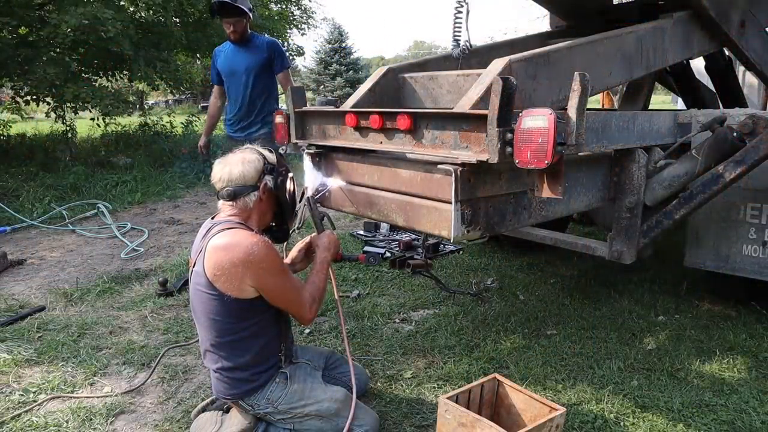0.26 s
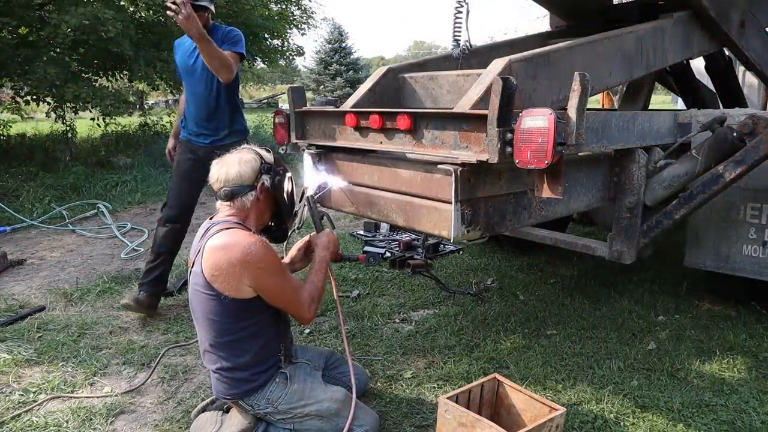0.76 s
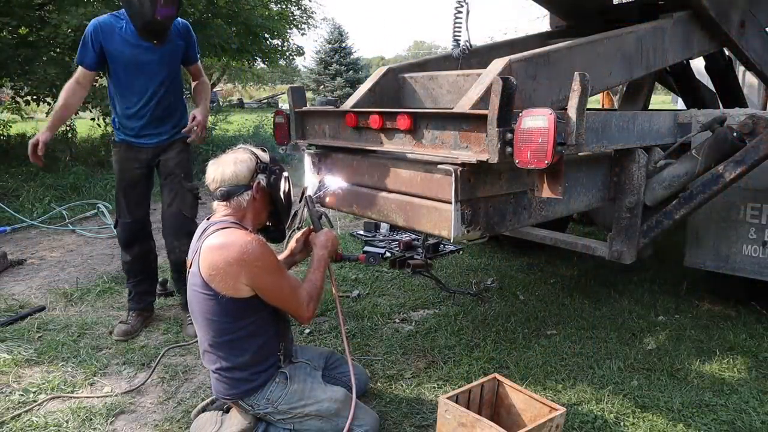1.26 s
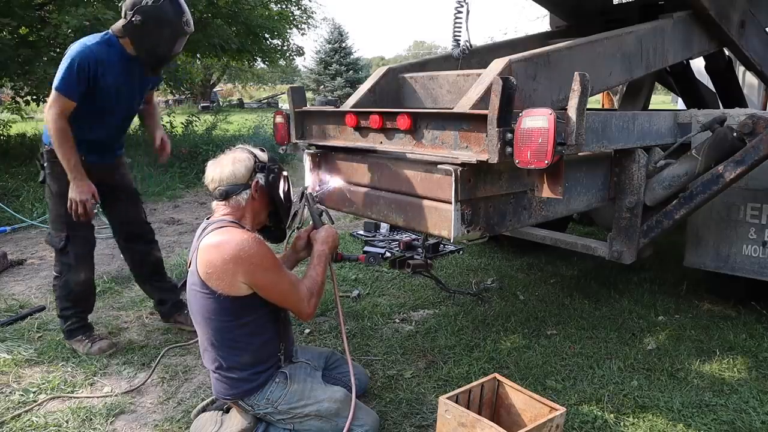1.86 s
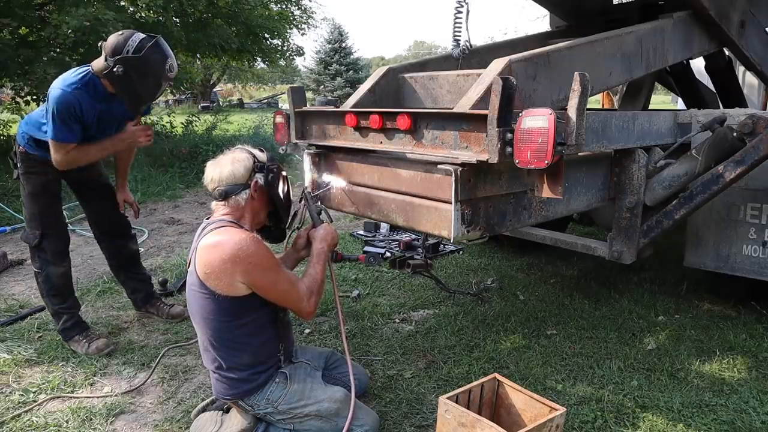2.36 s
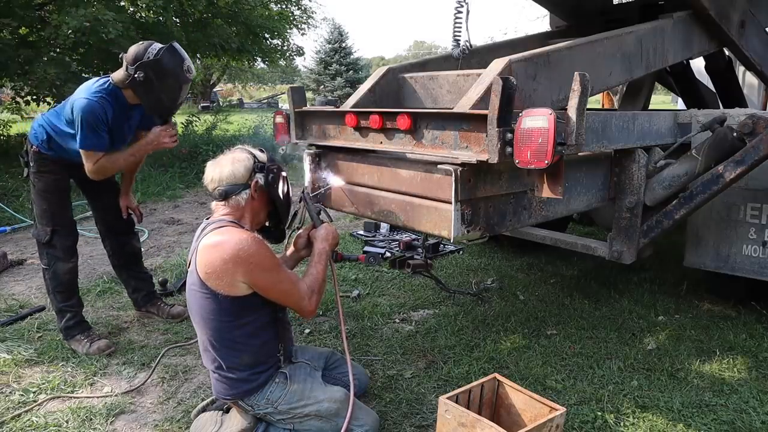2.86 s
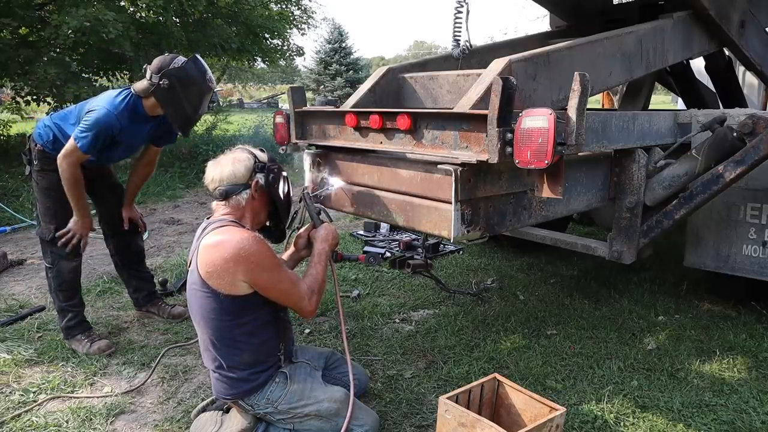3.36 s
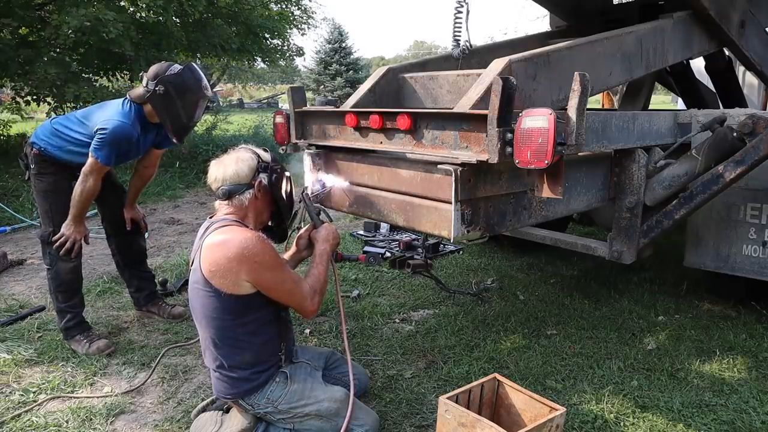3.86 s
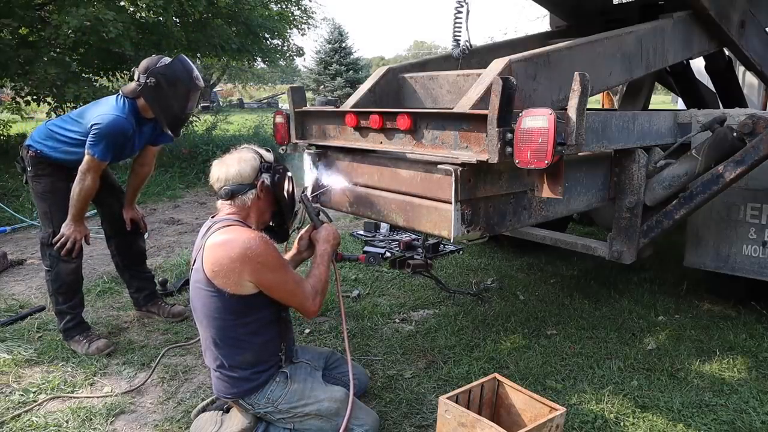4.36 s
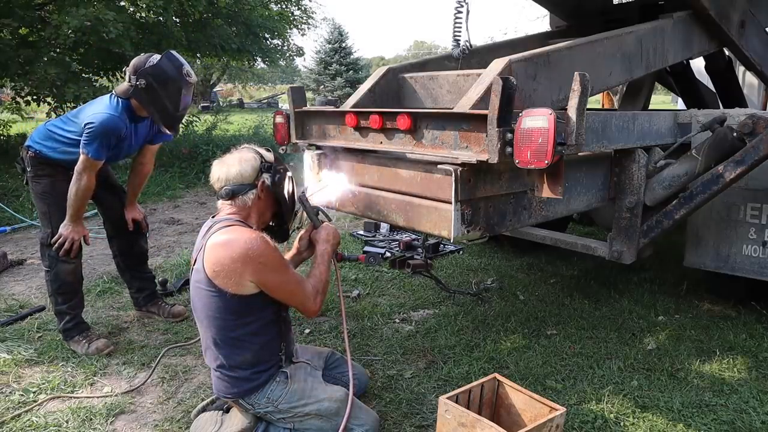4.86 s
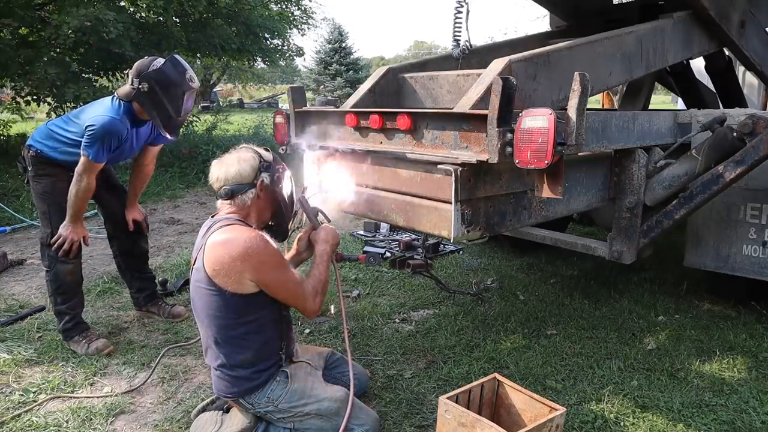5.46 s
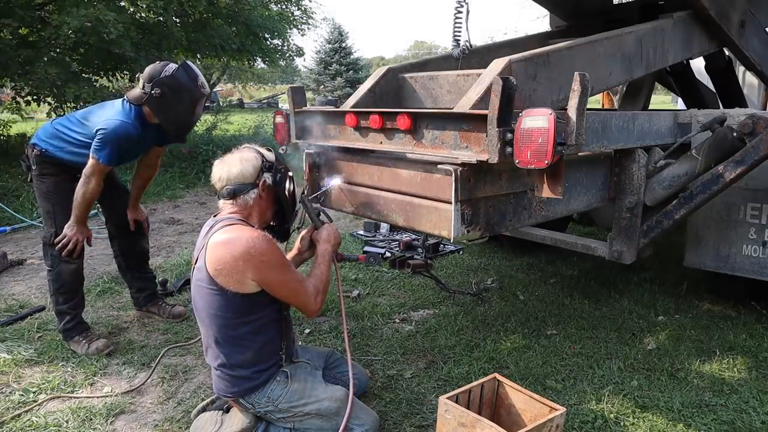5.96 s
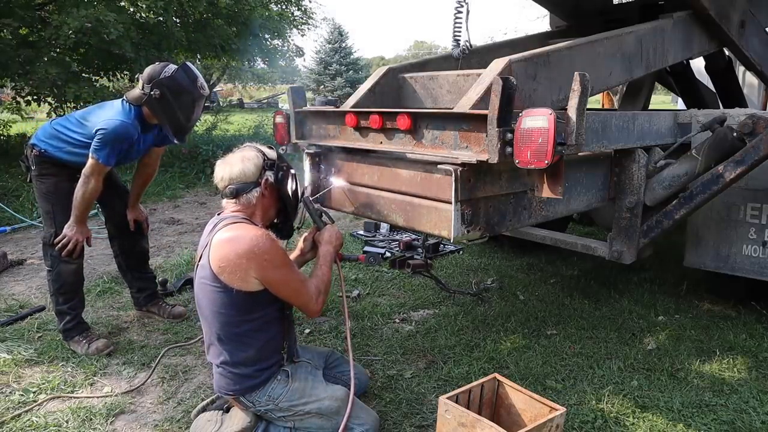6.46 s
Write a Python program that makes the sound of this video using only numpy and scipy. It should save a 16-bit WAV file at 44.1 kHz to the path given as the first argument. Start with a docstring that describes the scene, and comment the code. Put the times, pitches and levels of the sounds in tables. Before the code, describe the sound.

Continuous frying sizzle of arc welding on a steel trailer, dotted with sharp pops over a faint hum.

```python
"""Arc welding on a trailer

An arc sizzles at the steel tail of a trailer, outdoors. Dense sparks throb with the rectified mains
current; droplets short the arc out and it relights with a snap. The beams echo each spark, the frame
rings. Underneath: flame flutter, hum, one footfall, a little wind on the microphone.
Near the end the scene is heard from a second place, thin and bright."""
import sys
import numpy as np
from scipy import signal
from scipy.fft import rfft, irfft, next_fast_len
from scipy.io import wavfile
from scipy.ndimage import map_coordinates

SR = 44100
rng = np.random.default_rng(int(sys.argv[2]) if len(sys.argv) > 2 else 0)


def unload_wav(signal):
    """Save mono or channel-first audio to the path in sys.argv[1] as 16-bit WAV at rate SR, clipped to [-1, 1]."""
    wavfile.write(
        sys.argv[1],
        SR,
        np.round(np.clip(np.atleast_2d(signal).T, -1, 1) * 32767).astype(np.int16),
    )


N = 296352
TIME_S = np.arange(N) / SR
SECOND_PLACE_S = 5.89
FIRST_PLACE = TIME_S < SECOND_PLACE_S
RIPPLE_HZ = 120.04  # twice the mains frequency

# wind on the microphone: time_s, level_db
WIND_LEVELS = [(0, -71.5), (.6, -72.5), (.76, -59), (.9, -79), (1.2, -68), (1.37, -76), (1.5, -105),
               (5.89, -83), (6, -110), (6.72, -110)]
# wind buffet colour: freq_hz, relative_db
WIND_SPECTRUM = [(15, -18), (35, -10), (60, -11.5), (120, -26), (400, -70)]
# distant rumble colour: freq_hz, relative_db
DISTANT_SPECTRUM = [(30, -28), (80, -1.5), (150, -5.5), (220, -17.5), (500, -28)]
# arc drawn long, humming: start_s, length_s, hum_gain_db
LONG_ARCS = [(2.14, 0.071, 14), (2.9, 0.27, 9), (3.55, 0.24, 5), (4.1, 0.27, 6.5), (4.65, .09, 15),
             (5.51, 0.15, 17)]
# flame flare-ups: start_s, length_s, roar_gain_db
FLARE_UPS = [(4.64, 0.25, 5), (4.9, 0.37, 2), (5.45, 0.17, 4)]
# dull flame puffs: time_s, strength_db
FLAME_PUFFS = [(0.755, -27), (1.577, -23.5), (1.793, -24), (2.315, -18.5), (4.71, -15), (4.769, -12.5),
               (5.075, -29), (5.176, -35), (5.626, -20)]
# flame colour: freq_hz, relative_db
FLAME_SPECTRUM = [(150, -48), (240, -11), (330, 0), (480, -4.5), (900, 0), (1500, -15), (3000, -27.5)]
# steel frame decay: freq_hz, t60_s
FRAME_DECAY = [(300, 0.075), (2000, 0.024), (6000, 0.066), (14000, 0.069)]
# beam echoes, first place: delay_ms, gain_db
BEAM_ECHOES = [(.54, -9), (1.06, -16), (1.33, -16), (1.6, -15), (2.12, -11), (2.76, -17)]
# echo off the plate beside the rod: time_s, delay_ms
PLATE_DELAYS = [(0, .546), (.7, .525), (1.3, .544), (1.9, .54), (2.7, .576), (3.9, .574), (4.3, .614),
                (4.85, .554), (5.25, .584), (5.9, .58)]
# treble bands: low_hz, high_hz
TREBLE_BANDS = [(4400, 4950), (5050, 5900), (6500, 7700), (12300, 16500)]
# their gains as the rod moves along the beam: time_s, band1_db, band2_db, band3_db, band4_db
TREBLE_GAINS = [(0, 2, -7, -6.5, -6), (1.1, 2.5, -6, -1.5, -6), (1.9, -1.5, -6.5, 2.5, -4),
                (2.5, -1.5, -0.5, 3, -2.5), (3.45, -2.5, 1, 5.5, 0), (4.45, -3, 0, 2, -2.5),
                (4.62, -3, -7.5, 0, -10), (5.8, -3, -0.5, 2, -5)]
# sizzle colour, first place: freq_hz, relative_db
SIZZLE_SPECTRUM_1 = [(3530, -34.5), (5800, -5.5), (5990, -19), (6200, -13), (6600, -20), (6850, -7.5),
                     (7080, -15.5), (7400, -14), (9700, -8.5), (12000, -8.5), (13000, -4.5), (15000, -4.5),
                     (16000, -7.5)]
# sizzle colour, second place: freq_hz, relative_db
SIZZLE_SPECTRUM_2 = [(3060, -45.5), (5200, -8.5), (5550, -3), (6490, -7), (7500, -0.5), (8930, -8),
                     (11500, -3.5), (12600, -5.5), (15100, -2.5), (16000, -2.5)]
# roar colour, first place: freq_hz, relative_db
ROAR_SPECTRUM_1 = [(130, -31.5), (220, -18), (380, -13.5), (850, -3), (1170, -9.5), (1400, -2),
                   (1600, -5.5), (1850, -0.5), (2350, 2), (2800, -1.5), (3300, -1), (3530, -4.5), (3750, 0),
                   (4050, -2.5), (4800, -3.5), (5150, -11.5), (5800, -6), (6050, -33), (7500, -64.5)]
# roar colour, second place: freq_hz, relative_db
ROAR_SPECTRUM_2 = [(100, -40), (320, -14), (870, -22), (1550, -6.5), (2360, -9.5), (2640, -5), (3500, -5.5),
                   (4300, -11.5), (4800, -11.5), (5600, -54)]
# base levels of the arc: time_s, sizzle_db, roar_db, flutter_db
ARC_LEVELS = [(0, -53.5, -52.5, -65.5), (.45, -54, -53.5, -61.5), (1.1, -54, -51, -65),
              (1.55, -56, -52.5, -65.5), (2.05, -55, -50.5, -61), (2.5, -52, -49, -65),
              (2.8, -54, -50, -65.5), (3.3, -53.5, -51.5, -67), (3.95, -57.5, -52.5, -65),
              (4.5, -53, -53, -66.5), (5.05, -55, -50, -56.5), (5.36, -55.5, -52.5, -64.5),
              (5.5, -53.5, -51, -59), (5.86, -54.5, -54, -69.5), (5.92, -49.5, -63, -67),
              (6.38, -47, -64, -65), (6.54, -50, -64, -70), (6.72, -44.5, -61, -70)]
# brief dips in the sizzle: start_s, length_s, gain_db
SIZZLE_CHOKES = [(.36, 0.062, -5), (4.622, 0.062, -11), (5.545, 0.1, -11)]
# droplets shorting the arc: start_s, length_s
DROPLET_SHORTS = [(.21, .003), (1.431, .003), (2.92, .003), (3.323, .003), (3.939, .003), (4.232, .011),
                  (4.501, .003), (5.251, .003), (5.385, .004), (5.782, .007)]
# relighting snaps: time_s, treble_db, body_db
RELIGHT_SNAPS = [(0.096, -18, -30), (0.112, -24.0, -24), (0.1142, -15, -15), (0.1812, -15.5, -20),
                 (0.2156, -20, -32), (0.3534, -14.5, -21), (0.523, -31, -32), (0.527, -18.5, -18.5),
                 (0.7535, -28.0, -25.5), (0.9865, -24, -24), (1.0392, -33.0, -26), (1.0452, -23, -15.5),
                 (1.0543, -7.5, -10.5), (1.2746, -36, -17), (1.438, -14.5, -18.5), (1.5859, -15.5, -21),
                 (1.6355, -24, -30), (1.966, -20, -39), (1.9679, -24, -24), (1.9746, -14, -12),
                 (2.1047, -17, -17), (2.1978, -31.0, -19), (2.2022, -10.5, -8), (2.26, -21, -22),
                 (2.271, -18, -18), (2.276, -23.0, -17), (2.2874, -22, -18), (2.297, -21, -19),
                 (2.3035, -28.0, -16), (2.3142, -15, -14.5), (2.318, -17, -27), (2.5195, -15, -14),
                 (2.6316, -20, -31), (2.634, -31, -16), (2.64, -24.0, -22), (2.646, -16.0, -15),
                 (2.664, -28, -18), (2.671, -23, -22), (2.677, -24.0, -20), (2.681, -22, -19),
                 (2.686, -13.5, -14.5), (2.6889, -20, -25), (2.7005, -24, -25), (2.713, -14, -19),
                 (2.728, -21, -17), (2.7303, -21, -15), (2.887, -26.0, -19), (2.894, -19, -16.5),
                 (2.918, -31, -27), (2.9262, -8.5, -12), (2.9362, -28, -22), (2.942, -24, -37),
                 (2.944, -22, -22), (2.982, -23, -24), (3.005, -14, -15.5), (3.0175, -25, -29),
                 (3.0223, -14, -15.5), (3.18, -22.0, -23), (3.1872, -28, -23), (3.193, -17.0, -20.5),
                 (3.199, -15, -24.0), (3.295, -18, -15.5), (3.31, -27, -20), (3.3216, -32, -22.5),
                 (3.3293, -6, -11.5), (3.471, -18, -25), (3.4793, -31, -14.5), (3.588, -29, -21.5),
                 (3.6459, -28, -16.5), (3.6527, -8.5, -10.5), (3.7974, -18, -18), (3.8012, -26, -26),
                 (3.805, -30, -24), (3.817, -29, -26), (3.8212, -17.5, -16), (3.8267, -39.0, -19.5),
                 (3.83, -29, -19.5), (3.8348, -24, -17), (3.954, -18, -16.5), (3.9608, -21, -18.5),
                 (3.9641, -22, -22.5), (4.088, -24, -16.5), (4.1, -22, -19.5), (4.1036, -20, -18),
                 (4.161, -21, -11.5), (4.2092, -36, -29), (4.212, -34, -21), (4.2294, -29, -19.5),
                 (4.2454, -12, -18), (4.3796, -21, -23), (4.3862, -14.5, -16), (4.5071, -10.5, -19.5),
                 (4.578, -8.5, -13), (4.7598, -48, -15), (4.7693, -41, -22.5), (4.8105, -41, -20.5),
                 (4.8713, -37.0, -29), (4.8933, -28, -21), (4.9844, -13, -9), (5.0114, -39.0, -21),
                 (5.02, -25.5, -18), (5.0354, -25, -18), (5.09, -22, -18.5), (5.1272, -23, -21),
                 (5.1699, -30, -16), (5.2029, -21, -16.5), (5.2113, -33, -15), (5.257, -23, -19),
                 (5.3912, -20, -14), (5.632, -27, -27), (5.661, -32, -22), (5.6868, -31, -23),
                 (5.702, -23, -18.5), (5.7913, -8, -14), (5.8675, -29, -17), (5.8706, -23, -33),
                 (5.874, -12.5, -17.5), (5.9504, -18, -42), (6.0027, -14, -26.5), (6.035, -27, -27.5),
                 (6.083, -20, -29.5), (6.087, -27, -29), (6.1117, -35, -42), (6.1514, -29, -35),
                 (6.192, -31, -38), (6.2246, -20, -41), (6.185, -34, -33), (6.277, -35, -28),
                 (6.318, -9.5, -22.5), (6.4147, -15.5, -29), (6.42, -30, -37), (6.4245, -23, -32),
                 (6.4332, -8.5, -25.5), (6.4565, -27, -45), (6.4593, -27, -41), (6.4732, -28, -46),
                 (6.5979, -16.5, -34), (6.6666, -8, -26.5), (6.673, -27, -36.0), (6.676, -25, -45),
                 (6.6905, -27, -41)]


def amp(db):
    """dB to gain."""
    return 10 ** (np.asarray(db) / 20)


def unit_rms(x):
    """Scale to rms 1."""
    return x / np.sqrt(np.mean(x ** 2) + 1e-20)


def log_interp(points, hz):
    """Interpolate (freq_hz, value) rows on a log axis."""
    freq_hz, values = np.transpose(points)
    return np.interp(np.log(hz + 1), np.log(freq_hz + 1), values)


def curves(rows):
    """Per-sample curve of each column after time_s."""
    time_s, *columns = np.transpose(rows)
    return [np.interp(TIME_S, time_s, column) for column in columns]


def swells(rows, rise_s=0.079):
    """Sum of dB trapezoids from (start_s, length_s, gain_db) rows."""
    return sum(db * np.clip(np.minimum(TIME_S - start_s, start_s + length_s + rise_s - TIME_S)
                            / rise_s, 0, 1) for start_s, length_s, db in rows)


def wobble(rate_hz):
    """Smooth random curve."""
    return map_coordinates(rng.standard_normal(int(N * rate_hz / SR) + 4), [TIME_S * rate_hz])


def pulse(spectrum, echoes=(), size=4096):
    """Minimum-phase pulse plus echoes, energy 1."""
    hz = np.fft.rfftfreq(size, 1 / SR)
    cepstrum = irfft(np.log(np.maximum(amp(log_interp(spectrum, hz)), 1e-4)))
    cepstrum[1:size // 2] *= 2
    cepstrum[size // 2 + 1:] = 0
    paths = sum(amp(db) * np.exp(-2j * np.pi * hz * ms / 1000) for ms, db in echoes)
    lowpass = 1 / (1 + 1j * hz / 2500)  # echoes lose treble
    shape = irfft(np.exp(rfft(cepstrum)) * (1 + lowpass * paths))
    return shape / np.linalg.norm(shape)


def at_places(x, first, second):
    """Filter x with each listening place's pulse in turn."""
    fade = np.clip((TIME_S - SECOND_PLACE_S) / 0.007, 0, 1)
    return signal.fftconvolve(x * (1 - fade), first)[:N] + signal.fftconvolve(x * fade, second)[:N]


def wind():
    """Gusts buffet the microphone port over a steady distant rumble."""
    gusts, steady = rng.standard_normal((2, N))
    buffet = signal.fftconvolve(gusts, pulse(WIND_SPECTRUM))[:N]
    buffet *= amp(curves(WIND_LEVELS)[0] + wobble(8.2))
    distant = pulse(DISTANT_SPECTRUM)
    return buffet + at_places(amp(-75) * steady, distant, amp(-37) * distant)


def footfall(start_s=1.652, pitch_hz=245, level_db=-50, t60_s=0.041):
    """One soft step on grass: a damped sine."""
    age_s = np.maximum(TIME_S - start_s, 0)
    return amp(level_db - 60 * age_s / t60_s) * np.sin(2 * np.pi * pitch_hz * age_s)


def hum(drone_hz=480):
    """Unsteady ripple tone; a faint higher drone replaces it at the second place."""
    tone_db = -83.5 + swells(LONG_ARCS) + 2.1 * swells(FLARE_UPS) + 3.6 * wobble(22)
    tone = amp(tone_db) * np.sin(2 * np.pi * RIPPLE_HZ * TIME_S + 0.69 * wobble(22))
    drone_db = -78.5 + 1.5 * wobble(30)
    drone = amp(drone_db) * np.sin(2 * np.pi * drone_hz * TIME_S + 0.55 * wobble(30))
    fade = np.clip((TIME_S - SECOND_PLACE_S) / 0.02, 0, 1)
    return np.sqrt(2) * (tone * (1 - fade) + drone * fade)


def frame_ring(x):
    """Diffuse ringing of the trailer; a fresh noise tail per block."""
    ring = np.zeros(N)
    for block in np.array_split(np.arange(N), 32):
        hz, age_s, noise = signal.stft(rng.standard_normal(SR // 8), SR, nperseg=128)
        decay = amp(-60 * age_s / log_interp(FRAME_DECAY, hz)[:, None])
        tail = signal.istft(noise * decay, SR, nperseg=128)[1]
        tail = signal.lfilter([1], [1, -0.6], tail)  # steel soaks up treble
        wet = signal.fftconvolve(x[block], tail / np.linalg.norm(tail))
        ring[block[0]:block[0] + len(wet)] += wet[:N - block[0]]
    return np.pad(ring, (40, 0))[:N]


def ripple(depth):
    """Rectified current swells twice per mains cycle."""
    return 1 + depth * np.cos(2 * np.pi * RIPPLE_HZ * TIME_S + 2.3)


def sparks(rate_hz, glow_s, bed_db, burst=1):
    """Uneven random discharges, each trailing plasma hiss, over a hiss bed; rms 1."""
    fires = rng.random(N) < rate_hz / SR * ripple(0.7)
    size_db = 5 * np.minimum(rng.exponential(size=N), 3)
    discharges = unit_rms(fires * amp(size_db))
    heat = unit_rms(signal.lfilter([1], [1, -np.exp(-1 / (glow_s * SR))], discharges))
    hiss = 0.5 * rng.standard_normal(N) * (burst * heat + amp(bed_db) * ripple(0.044))
    return unit_rms(hiss - discharges)


def flame(puff_s=0.00029):
    """Low flutter and soft puffs, first place only; listed snaps also puff the flame."""
    flare_db = swells(FLARE_UPS)
    flutter = sparks(rate_hz=280, glow_s=0.002, bed_db=2.5 + 1.2 * flare_db)
    flutter *= FIRST_PLACE * amp(curves(ARC_LEVELS)[2] + 1.6 * flare_db)
    push = np.exp(-np.arange(256) / (puff_s * SR))
    kicks = [(time_s, body_db - 25) for time_s, _, body_db in RELIGHT_SNAPS if time_s < SECOND_PLACE_S]
    for time_s, strength_db in FLAME_PUFFS + kicks:
        flutter[round(time_s * SR):][:len(push)] -= amp(strength_db) * push / push.sum()
    return signal.fftconvolve(flutter, pulse(FLAME_SPECTRUM, BEAM_ECHOES))[:N]


def plate_echo(x):
    """The plate returns an inverted copy, first place only."""
    lag = curves(PLATE_DELAYS)[0] * SR / 1000
    return -amp(-7.5) * FIRST_PLACE * map_coordinates(x, [np.arange(N) - lag])


def rod_travel(x):
    """Treble colour shifts as the rod moves, first place only."""
    bands = [signal.sosfiltfilt(signal.butter(2, hz, "band", fs=SR, output="sos"), x)
             for hz in TREBLE_BANDS]
    gains_db = curves(TREBLE_GAINS)
    gains_db[1] += swells(SIZZLE_CHOKES, rise_s=0.03)
    return x + FIRST_PLACE * sum((amp(db) - 1) * band for db, band in zip(gains_db, bands))


def snaps_nearby(reach_s=0.0035):
    """Smooth count of snaps near each moment."""
    grid_s = np.arange(0, N + 64, 64) / SR
    count = sum(np.exp(-((grid_s - time_s) / reach_s) ** 2) for time_s, *_ in RELIGHT_SNAPS)
    return np.interp(TIME_S, grid_s, count)


def snaps():
    """Each relight is one blow and a ragged crack; returns treble and softened body."""
    cracks = 0.16 * rng.standard_normal((len(RELIGHT_SNAPS), 64)) * np.exp(-np.arange(64) / 22)
    cracks[:, 0] = -1
    cracks /= np.linalg.norm(cracks, axis=1, keepdims=True)
    treble, body = np.zeros((2, N))
    for (time_s, treble_db, body_db), crack in zip(RELIGHT_SNAPS, cracks):
        onset = round(time_s * SR)
        emphasis = 0.6 * (time_s < SECOND_PLACE_S)
        treble[onset:][:64] += amp(treble_db) * signal.lfilter([1, -emphasis], [1.3], crack)
        body[onset:][:64] += amp(body_db) * signal.lfilter([0.88], [1, -0.12], crack)
    return treble, body


def arc():
    """Sparks and snaps drive a bright sizzle and a roar in the beams; busier around each snap."""
    unrest, flare_db = snaps_nearby(), swells(FLARE_UPS)
    sizzle_db, roar_db, _ = curves(ARC_LEVELS)
    sizzle_db += 3.45 * unrest + swells(SIZZLE_CHOKES, rise_s=0.04)
    roar_db += 0.33 * unrest + flare_db
    bed_db = np.array([[-5], [-1]]) + 0.069 * flare_db + 6 * ~FIRST_PLACE  # rows: sizzle, roar
    crackle = sparks(rate_hz=1500, glow_s=0.0012, bed_db=bed_db, burst=np.where(FIRST_PLACE, 1, 0.45))
    spatter_rate_hz = 4 + 8 * unrest  # small chance snaps
    crackle -= (rng.random(N) < spatter_rate_hz / SR) * amp(16 + 6.2 * rng.standard_normal(N))
    shorts = [(start_s, length_s, -22) for start_s, length_s in DROPLET_SHORTS]
    crackle *= amp(swells(shorts, rise_s=0.002))
    tilt_db = 0.6 * wobble(250)
    treble, body = crackle * amp([sizzle_db + tilt_db, roar_db - tilt_db]) + snaps()
    sizzle = at_places(treble, pulse(SIZZLE_SPECTRUM_1), pulse(SIZZLE_SPECTRUM_2))
    roar = at_places(body, pulse(ROAR_SPECTRUM_1, BEAM_ECHOES), pulse(ROAR_SPECTRUM_2))
    return sizzle + plate_echo(sizzle) + roar


def scene():
    """Mono mix of weld, frame, hum, wind and footfall."""
    weld = rod_travel(arc()) + flame()
    return (weld + amp(-12.5) * frame_ring(weld) + hum() + wind() + footfall())[None]


def record(dry):
    """Brick-wall lowpass."""
    cutoff_hz = 15830
    size = next_fast_len(N + SR // 2)
    passband = np.fft.rfftfreq(size, 1 / SR) < cutoff_hz
    return irfft(rfft(dry, size) * passband, size)[..., :N]


dry = scene()
out = record(dry)
unload_wav(out)
```